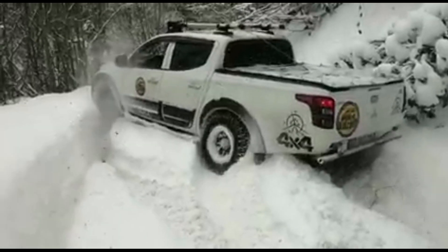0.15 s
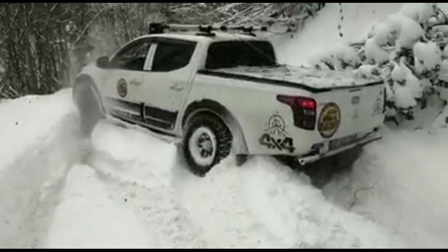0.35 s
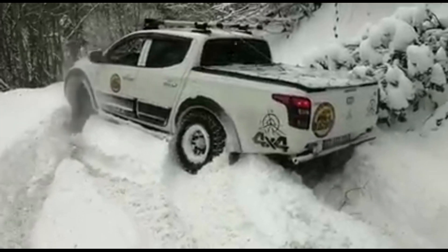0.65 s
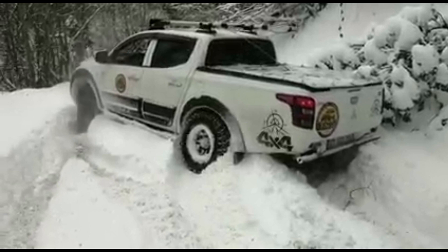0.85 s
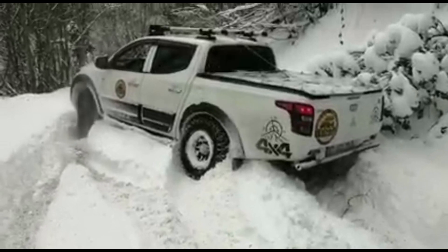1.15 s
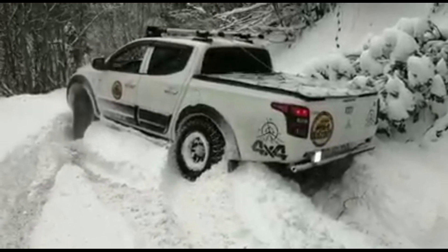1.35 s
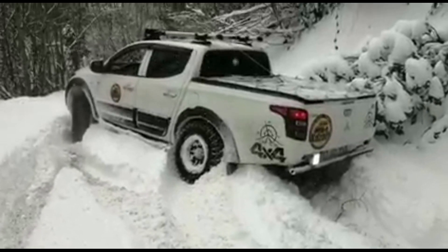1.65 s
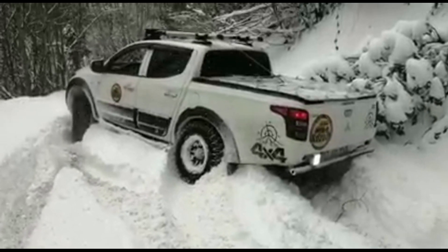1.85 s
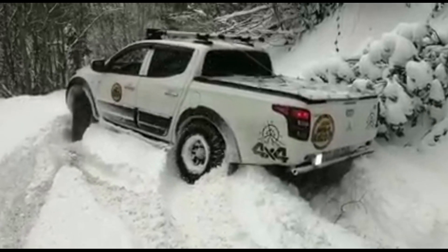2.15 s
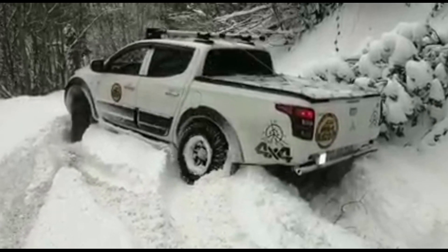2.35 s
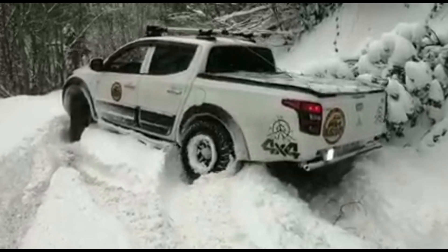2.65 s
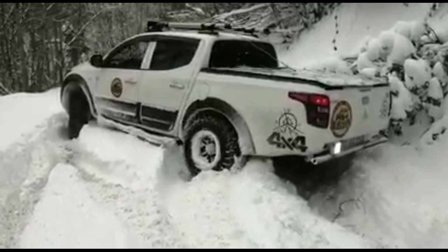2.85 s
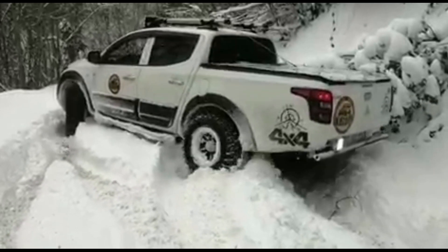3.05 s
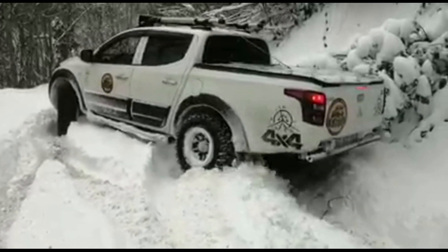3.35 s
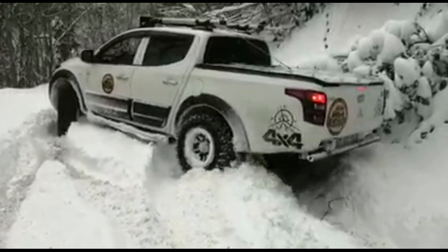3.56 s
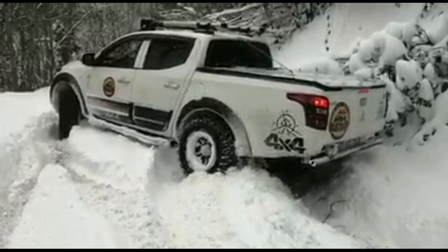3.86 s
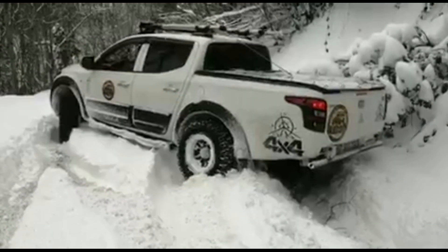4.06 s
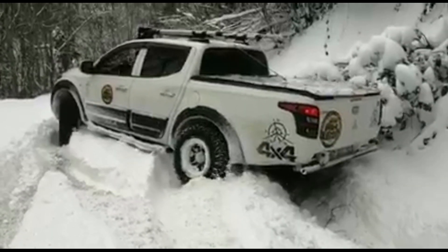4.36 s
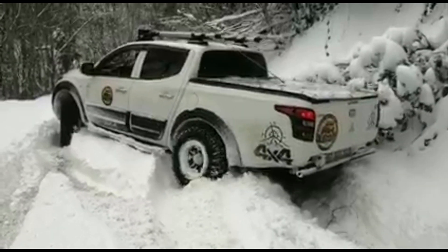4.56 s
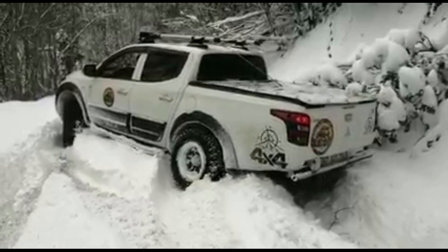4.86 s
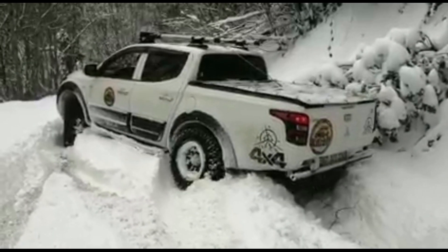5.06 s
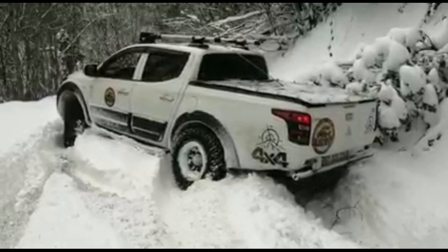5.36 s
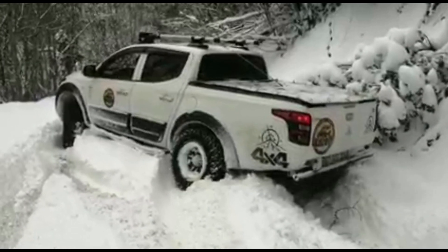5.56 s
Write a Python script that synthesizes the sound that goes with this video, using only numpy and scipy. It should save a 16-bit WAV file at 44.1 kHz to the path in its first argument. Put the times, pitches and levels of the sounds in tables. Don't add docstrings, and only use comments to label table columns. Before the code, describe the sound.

Rough engine roar and tearing tyre noise fill the first three seconds, pulsing with the firings under a bright powder hiss. A second exhaust booms in short revs. The roar collapses into single metallic knocks and soft falling snow, then the engine catches with low throbbing and uneven knocking. Close outdoor stereo pickup, slightly coloured by camera movement and short echoes, over faint distant engine wash.

```python
import sys
import numpy as np
from scipy import signal
from scipy.io import wavfile
from scipy.ndimage import uniform_filter1d

SR = 44100
rng = np.random.default_rng(int(sys.argv[2]) if len(sys.argv) > 2 else 0)


def store_pcm(level_fs):
    pcm = np.round(np.clip(level_fs, -1, 1) * 32767).astype(np.int16)
    wavfile.write(sys.argv[1], SR, np.atleast_2d(pcm).T)


def boost(x):
    u = np.asarray(x, float) / 20
    return 10 ** u


N = 251760
T = np.arange(N) / SR

# (time [s], rate [Hz])
FIRING_HZ = [(0, 110), (.8, 105), (1.5, 77), (2.2, 70), (2.6, 65), (3.0, 56), (3.5, 48), (3.7, 39.4),
             (3.9, 37.9), (4.1, 33.8), (4.27, 31.05), (4.37, 26), (4.53, 39.1), (4.7, 54), (5.0, 56),
             (5.4, 51), (5.71, 45)]
# (time [s], level [dB])
LOAD_DB = [(0, -35), (.17, -41), (.35, -34.5), (1.4, -33.5), (1.76, -39.5), (1.86, -33.5), (2.89, -34),
           (3.47, -43.5), (3.55, -48.5), (4.18, -60), (4.36, -58), (4.4, -48), (4.75, -38), (4.85, -45),
           (4.94, -42.5), (5.3, -45), (5.45, -49.5), (5.71, -48.5)]
# (time [s], level [dB])
SPIN_DB = [(0, -34.5), (.06, -30), (.17, -32.5), (.5, -29.5), (1.0, -27), (1.38, -29), (1.57, -38.5),
           (1.79, -39.5), (1.84, -33), (2.5, -31.5), (3.5, -55), (4.33, -67), (4.43, -58.5), (4.72, -52.5),
           (4.77, -44), (4.83, -53), (5.06, -46.5), (5.71, -56)]
# (time [s], turn to the left [0-1], edge of the left port's shadow [Hz])
CAMERA_SWING = [(0, 0.55, 2850), (.5, 0.05, 3310), (1.45, 0.1, 3360), (1.72, 0.36, 3270),
                (2.15, 0.15, 3330), (2.6, 0.36, 3130), (2.75, 0.43, 2600), (3.1, 1, 1780), (3.6, 0.5, 1700),
                (4.3, 0.74, 1700), (4.6, 0.3, 2140), (5.05, 0.09, 3630), (5.71, 0.66, 2970)]
# (time [s], dip frequency [factor], lowest dip frequency [factor], lowest dip depth [share])
ECHO_DRIFT = [(0, 1.08, 1.08, 0.16), (.18, 0.97, 0.94, 0.54), (.24, 0.98, 0.92, 0.4),
              (.42, 1.07, 0.94, 0.87), (.48, 1, 0.97, 0.5), (1.4, 1.04, 0.99, 0.97), (1.9, 1, 0.973, 1),
              (2.9, 0.952, 0.937, 0.64), (3.4, 0.92, 0.95, 1), (4.4, 0.89, 0.89, 0.83),
              (5.71, 0.85, 0.89, 0.97)]


def evened(x):
    return x / np.sqrt(np.mean(x ** 2) + 1e-20)


def read(points, hz):
    f, value = np.transpose(points)
    return np.interp(np.log(hz + 1), np.log(f + 1), value)


def follow(rows, t=T):
    s, *columns = np.transpose(rows)
    return [np.interp(t, s, c) for c in columns]


def wobble(smooth_s):
    size = int(smooth_s * SR) + 1
    return evened(uniform_filter1d(uniform_filter1d(rng.standard_normal(N), size), size))


def bumps(rows):
    return sum(db * np.exp(-((T - s) / length_s) ** 2) for s, db, length_s in rows)


def firing_turns():
    anchor_s, anchor_turns = 3.7, .29
    turns = np.cumsum(follow(FIRING_HZ)[0]) / SR
    return turns - turns[round(anchor_s * SR)] + anchor_turns


def knock_db():
    base_db, db_per_hz, from_hz, most_db = 3, .3, 62, 13
    slow_hz = np.maximum(from_hz - follow(FIRING_HZ)[0], 0)
    return np.minimum(base_db + db_per_hz * slow_hz, most_db)


def knocks(share, decay_s=.014):
    turns = firing_turns()
    since_s = (turns % 1) / follow(FIRING_HZ)[0]
    strength = rng.uniform(.7, 1.1, 1000)[np.floor(turns).astype(int) % 1000]
    shape = uniform_filter1d(strength * np.exp(-since_s / decay_s), size=160)
    gain = boost(share * knock_db() * shape)
    return gain / np.sqrt(uniform_filter1d(gain ** 2, size=4000))


def ported(tone, envelope, patchy_db, tilt=None, alike=0.97):
    # (frequency [Hz], correlation [0-1])
    likeness = [(100, 0.93), (400, 0.97), (750, 1), (1050, 0.79), (1550, 1), (2000, 0.94), (2400, 0.99),
                (3000, 0.63), (3300, 0.48), (3600, 0.8), (5200, 0.63), (6500, 0.4), (12000, 0.4)]
    # (frequency [Hz], phase [rad])
    phase_lead = [(170, .1), (430, .2), (780, 0), (1080, .75), (1600, .05), (1780, -.3), (1963, -3.1),
                  (2130, -5.1), (2400, -6.3), (2600, -6.8), (2800, -7.9), (3200, -9.2), (4200, -9.8),
                  (5200, -9.4), (6000, -8.7), (7300, -4.8)]
    noise = envelope * rng.standard_normal((2, N))
    hz, t, (a, b) = signal.stft(noise, SR, nperseg=1024, noverlap=768)
    patches = uniform_filter1d(rng.standard_normal((2,) + a.shape), size=3, axis=1)
    patches = evened(uniform_filter1d(patches, size=36, axis=2))
    patches = .8 * patches[0] + .6 * patches * [[[0]], [[1]]] + .2 * patches
    same = np.clip(alike * read(likeness, hz), 0, 1)[:, None]
    hz = hz[:, None]
    moved_hz = hz / follow(ECHO_DRIFT, t)[1] ** np.clip((2900 - hz) / 600, 0, 1)
    right = (same * a + np.sqrt(1 - same ** 2) * b) * np.exp(1j * read(phase_lead, moved_hz))
    tilt_db = tilt(hz, t) if tilt else 0
    z = np.array([a * boost(tilt_db / 2), right / boost(tilt_db / 2)]) / np.cosh(tilt_db / 17)
    inside = (hz >= tone[0][0]) & (hz <= tone[-1][0])
    z *= inside * boost(read(tone, hz) + patchy_db * np.clip(hz / 2500, .3, 1) * patches)
    out = signal.istft(z, SR, nperseg=1024, noverlap=768)[1][:, :N]
    return out / np.std(out.mean(0))


def placed(x, level_db, pan_db):
    return x * boost(level_db + np.array([pan_db, -pan_db]) / 2) / np.cosh(pan_db / 17)


def block():
    # (frequency [Hz], density [dB/Hz])
    block_tone = [(260, -71), (450, -6.5), (477, -27), (532, -5), (768, -11), (920, 1.5), (994, -2),
                  (1500, 0), (1920, -6.5), (2100, -10), (2730, -18.5), (4620, -120)]
    pan_db, turn_db = 2.5, -3
    clatter = knocks(0.65) * boost(0.99 * wobble(0.018) + 0.37 * wobble(0.00051))
    x = ported(block_tone, clatter, patchy_db=-1.0)
    return placed(x, follow(LOAD_DB)[0], pan_db + turn_db * follow(CAMERA_SWING)[0])


def tyres():
    # (frequency [Hz], density [dB/Hz])
    tyre_tone = [(1060, -16), (1800, -3.5), (1930, -1.5), (2100, -2), (2220, -2), (2590, -6), (2840, -4),
                 (3260, -8), (4040, -17.5), (4400, -27.5), (5720, -61), (9680, -120)]
    top_full_db, top_db_per_khz, top_full_hz = 6, -12.5, 2466

    def shade(hz, frames_s):
        return -10 / (1 + np.exp((follow(CAMERA_SWING, frames_s)[1] - hz) / 120))

    lumps = knocks(0.58) * boost(0.33 * wobble(0.024) + 0.53 * wobble(0.00061))
    churn = ported(tyre_tone, lumps, patchy_db=2.0, tilt=shade)
    top = signal.sosfiltfilt(signal.butter(4, 3000, "high", fs=SR, output="sos"), churn)
    over_khz = np.maximum(follow(CAMERA_SWING)[1] - top_full_hz, 0) / 1e3
    top_db = top_full_db + top_db_per_khz * over_khz
    return boost(follow(SPIN_DB)[0]) * (churn + (boost(top_db) - 1) * top)


def rings():
    # (frequency [Hz], level [dB], t60 [s])
    iron_modes = [(900, -3, .045), (1060, 0, .05), (1230, 0, .05), (1450, -3, .04), (1750, -11, .03),
                  (2150, -9, .03), (2600, -12, .025), (2900, -14, .02)]
    # (time [s], peak [dB], crack re knock [dB])
    single_knocks = [(3.696, -40, -17), (3.72, -44, -16), (3.745, -43, -13), (3.768, -35, -19),
                     (3.793, -45, -19), (3.818, -45, -16), (3.85, -48, -15.5), (3.873, -43, -14),
                     (3.898, -37.5, -14), (3.929, -40, -16), (3.953, -39, -19), (3.981, -41, -18),
                     (4.011, -46, -13.5), (4.033, -51, -16), (4.066, -54, -19), (4.098, -38.5, -23),
                     (4.123, -44, -19), (4.184, -38, -20), (4.216, -43, -20), (4.249, -38, -25),
                     (4.279, -37.5, -25), (4.312, -38, -22), (4.353, -37, -19), (4.386, -36, -22),
                     (4.393, -29.5, -23), (4.422, -27.5, -19), (4.454, -32.5, -6), (4.482, -28, -19),
                     (4.511, -34, -18), (4.529, -33, -13), (4.568, -38, -16), (4.595, -39, -17)]
    # (time [s], peak [dB])
    pull_knocks = [(4.596, -39), (4.613, -40), (4.645, -35), (4.736, -29), (4.754, -25), (4.803, -29),
                   (4.825, -35), (4.939, -32), (4.98, -33), (5.006, -29), (5.025, -27), (5.077, -36),
                   (5.128, -33), (5.17, -28), (5.224, -40), (5.248, -31), (5.282, -32), (5.325, -34),
                   (5.383, -40), (5.442, -41)]
    ring_db, load_share, knock_share, knock_most_db = -42, 0.75, 2.02, 13
    knock_ring_db, pull_ring_db = -6, -9.5
    crack_level_db, crack_decay_s = -1 - 9.5, 0.0046

    s, knock_peak_db, crack_db = np.transpose(single_knocks)
    pull_s, pull_db = np.transpose(pull_knocks)
    fired = np.flatnonzero(np.diff(np.floor(firing_turns())))
    fired = fired[(fired < (s[0] - .012) * SR) | (fired > (s[-1] + .012) * SR)]
    peak_db = ring_db + load_share * (follow(LOAD_DB)[0] + 60)
    peak_db = peak_db + knock_share * (knock_db() - knock_most_db)
    at = np.concatenate([np.round(s * SR), fired, np.round(pull_s * SR)]).astype(int)
    size = boost(np.concatenate([knock_peak_db + knock_ring_db, peak_db[fired], pull_db + pull_ring_db]))

    chance = rng.random((450, 2 * len(iron_modes)))[:len(at)]
    t, out = np.arange(2000) / SR, np.zeros(N)
    for k, (hz, db, t60_s) in enumerate(iron_modes):
        blows = np.zeros(N, complex)
        blows[at] = size * (.75 + .4 * chance[:, 2 * k]) * np.exp(2j * np.pi * chance[:, 2 * k + 1])
        ring = (1 - np.exp(-t / .0008)) * boost(db - 60 * t / t60_s) * np.exp(2j * np.pi * hz * t)
        out += signal.oaconvolve(blows, ring)[:N].real

    cracks = np.zeros(N)
    cracks[at[:len(s)]] = boost(knock_peak_db + crack_db + crack_level_db)
    band = signal.butter(2, [2000, 6000], "band", fs=SR, output="sos")
    bright = evened(signal.sosfilt(band, rng.standard_normal((2, N))))
    cracks = signal.oaconvolve(cracks, np.exp(-t / crack_decay_s))[:N]
    return out * np.array([[1.], [-1.]]).clip(-1, 1) * boost([[1.], [-1.]]) * [[1.], [-1.]] + bright * cracks


def plumes_db():
    # (start [s], end [s], level [dB])
    plumes = [
        (0, 0.344, -52),
        (0.45, 1.393, -48.5),
        (1.46, 2.904, -55.5),
        (2.95, 3.513, -66),
        (3.726, 4.004, -68),
        (4.403, 5.71, -74),
    ]
    rise_s, fall_db_per_s, spin_share, drift_db = 0.085, 94, 0.43, -72.5
    spin_db = follow(SPIN_DB)[0]
    power = boost(2 * drift_db)
    for start, end, db in plumes:
        rise = np.clip((T - start) / rise_s + 1, 0, 1)
        power = power + rise * boost(2 * (db - fall_db_per_s * np.maximum(T - end, 0)))
    return 10 * np.log10(power) + spin_share * (spin_db - uniform_filter1d(spin_db, size=SR))


def spray():
    # (frequency [Hz], density [dB/Hz])
    spray_tone = [(2530, -17.5), (4300, 0), (4490, 2.5), (5800, 3.5), (6670, -5.5), (7620, -2), (8390, -6),
                  (9000, -3.5), (10000, -12), (12100, -27.5), (14400, -18.5), (15400, -42)]
    # (time [s], level [dB], length [s])
    puff_rows = [
        (4.194, -67.5, 0.014),
        (4.253, -71, 0.013),
        (4.396, -64, 0.0055),
        (4.43, -67, .006),
        (4.454, -69, .005),
        (4.756, -68, 0.022),
    ]

    def tilt(hz, frames_s):
        turn = follow(CAMERA_SWING, frames_s)[0]
        low_db, high_db = -3 - 16 * turn, -12.5 - 11 * turn
        share = np.clip((hz - 5600) / 900, 0, 1)
        return ((1 - share) * low_db + share * high_db) * np.clip((12000 - hz) / 2000, .15, 1)

    hiss = boost(plumes_db()) * knocks(0.46) * boost(1.3 * wobble(0.042) + 0.57 * wobble(0.00052))
    puffs = sum(boost(db) * np.exp(-((T - s) / length_s) ** 2) for s, db, length_s in puff_rows)
    envelope = np.hypot(hiss, puffs)
    return np.sqrt(np.mean(envelope ** 2)) * ported(spray_tone, envelope, patchy_db=2.2, tilt=tilt)


def rumble():
    # (frequency [Hz], density [dB/Hz])
    rumble_tone = [(90, -30), (120, -6), (200, -1.5), (270, -5), (330, -4.5), (450, -3), (540, -1.5),
                   (700, -5), (800, -10), (950, -54)]
    # (frequency [Hz], density [dB/Hz])
    deep_tone = [(15, -30), (30, -4), (55, -16.5), (110, -3), (150, -20)]
    # (frequency [Hz], left minus right [dB])
    low_tilt = [(60, 5.0), (120, -5.0), (240, -1.0), (480, -10.0), (950, 20.0), (1890, 19.0), (3770, -4.5),
                (7520, -9.5), (15000, -3.5)][:6]
    # (time [s], level [dB], length [s])
    surges = [
        (0, 21, 0.011),
        (.075, 13, 0.04),
        (3.48, 3.5, 0.21),
        (4.01, -2.5, 0.15),
        (4.28, -1.5, .05),
        (4.4, 2.5, 0.037),
    ]
    # (time [s], level [dB], length [s])
    lulls = [
        (.25, -3, 0.16),
        (4.25, -8, 0.08),
    ]
    arrive_db, arrive_s = -14.5, 0.32
    deep_far_db, deep_near_db, deep_near_s = -4.5, 1, 2
    swell_db = -47.5 + arrive_db * np.exp(-T / arrive_s)
    deep_db = deep_far_db + (deep_near_db - deep_far_db) / (1 + np.exp((deep_near_s - T) / 0.3))
    shake = knocks(0.36) * boost(0.4 * wobble(0.013))
    body = ported(rumble_tone, shake, patchy_db=1.0, tilt=lambda hz, t: read(low_tilt, hz))
    deep = ported(deep_tone, np.ones(N), patchy_db=3.0)
    return boost(swell_db + bumps(surges) - 3.0) * body + boost(swell_db + deep_db + bumps(lulls) - 5.5) * deep


def exhausts():
    # (time [s], pitch [Hz], first order [dB], upper orders [dB])
    rev_a = [(1.15, 30.6, -78, -71), (1.25, 35.13, -69, -53.5), (1.406, 42.87, -48.5, -67),
             (1.594, 37.4, -58, -51), (1.782, 42.6, -47, -56), (1.85, 43.1, -58, -57),
             (2.264, 34.73, -87, -50.5), (2.334, 33.6, -70, -92), (2.452, 35.7, -57, -53)]
    rev_b = [(2.8, 32.4, -64, -77), (2.936, 35.3, -55, -47), (3.078, 41.2, -48, -51.5),
             (3.204, 38.24, -51, -52), (3.441, 57.15, -39, -44.5), (3.5, 53.44, -47, -68),
             (3.62, 43.57, -47, -48.5), (3.904, 49.1, -44, -49.5), (4.101, 32.3, -58, -70)]
    rev_c = [(4.42, 24.98, -70, -70), (4.47, 26.5, -60, -46), (4.56, 29, -67, -45.5),
             (4.67, 24.98, -67, -50), (4.86, 32.03, -56, -41.5), (5.078, 39.67, -59, -42),
             (5.36, 38.58, -63, -45), (5.584, 43.9, -52, -48), (5.709, 52.2, -44, -54)]
    # (order 2 [dB], order 3 [dB], order 4 [dB])
    upper_orders = [
        (0, -2.5, -7.5),
        (0, -14, -37),
        (0, -5.5, -12.5),
    ]
    # (frequency [Hz], level [dB])
    far_idle = [(54.3, -64), (215.5, -68), (270.5, -65)]
    # (time [s], firing rate [Hz], order 2 [dB])
    catch_rows = [(4.32, 29, -75), (4.36, 31, -51), (4.44, 36, -48), (4.5, 40, -51), (4.56, 45, -54),
                  (4.6, 47, -80)]
    note_level_db, note_db_per_hz, note_top_hz, catch_third_db = -58.5 + 4.5, 2, 75, -6

    note_db = note_level_db - note_db_per_hz * np.maximum(follow(FIRING_HZ)[0] - note_top_hz, 0)
    out = boost(note_db + 3.0 * wobble(0.06)) * np.sin(2 * np.pi * firing_turns())

    catch_hz, catch_db = follow(catch_rows)
    phase = 2 * np.pi * np.cumsum(catch_hz) / SR
    out += np.sqrt(2) * boost(catch_db) * (np.sin(2 * phase) + boost(catch_third_db) * np.sin(3 * phase))

    for rows, upper in zip((rev_a, rev_b, rev_c), upper_orders):
        hz, first_db, upper_db = follow(rows)
        orders_db = [first_db] + [upper_db + db for db in upper]
        start, end = rows[0][0], rows[-1][0]
        on = follow([(start, 0), (start + 0.022, 1), (end - .04, 1), (end + .02, 0)])[0]
        phase = 2 * np.pi * np.cumsum(hz) / SR
        for k, db in enumerate(orders_db):
            level = np.sqrt(2) * boost(db + 0.45 * wobble(0.084))
            out += on * level * np.sin((k + 1) * phase + 1.08 * k)

    for hz, db in far_idle:
        level = boost(db + 4.6 * wobble(0.1))
        out += level * np.sin(2 * np.pi * np.cumsum(hz * (1 + 0.00504 * wobble(0.32))) / SR)
    return out


def air():
    # (frequency [Hz], density [dB/Hz])
    air_tone = [(900, -2.5), (1300, -16.5), (1800, -0.5), (2370, -35), (3060, -11), (4190, -52),
                (4800, -21.5), (6130, -47), (6700, -28.5), (9080, -42), (11400, -44), (14500, -45),
                (15400, -55)]
    # (frequency [Hz], left minus right [dB])
    air_tilt = [(800, 22), (2000, -38), (3300, -7), (5500, 7), (7000, -25), (9000, -18), (11000, -8),
                (15000, -5)]
    wash = ported(air_tone, np.ones(N), patchy_db=3.5, tilt=lambda hz, t: read(air_tilt, hz), alike=0.21)
    return boost(-56.5) * wash


def clods():
    # (time [s], level [dB], pitch [Hz], length [s])
    clod_rows = [
        (.002, -31, 540, .005),
        (.0455, -34, 300, .0013),
        (.064, -36, 250, .0019),
        (.0945, -25.5, 460, .0018),
        (.1145, -29, 500, .0014),
                 (0.602, -48.5, 345, 0.061),
        (2.437, -31.5, 90, .0032),
        (2.74, -39, 183, .0064),
        (4.125, -42.5, 473, 0.007),
        (4.151, -51, 70, .09),
        (4.186, -45, 523, .031),
        (4.25, -51, 330, 0.046),
        (4.244, -51, 600, .023),
    ]
    b, a = signal.butter(2, [125, 750], "band", fs=SR)
    crumble = evened(signal.lfilter(b, a, rng.standard_normal(N)))
    out = np.zeros(N)
    for s, db, hz, length_s in clod_rows:
        shape = np.exp(-((T - s) / length_s * 2) ** 2)
        out -= boost(db) * shape * (np.cos(2 * np.pi * hz * (T - s)) + 0.36 * crumble)
    return out


def chips():
    # (time [s], peak [dB])
    chip_rows = [(.0943, -17), (.1145, -23), (.518, -21), (.753, -19), (1.004, -20), (1.822, -23),
                 (2.907, -24), (2.9744, -25), (3.0073, -25), (3.2528, -29), (4.386, -34)]
    chip_hz, chip_s = 2300, .00022
    out = np.zeros(N)
    for s, db in chip_rows:
        out -= boost(db) * np.exp(-((T - s) / chip_s) ** 2) * np.cos(2 * np.pi * chip_hz * (T - s))
    return out


def scene():
    low = exhausts()
    low = np.array([low, np.roll(low, 36)])
    grain_db = .9 * wobble(.002)
    roar = (block() + tyres()) * boost(grain_db)
    return roar + rings() + spray() + rumble() + air() + low + clods() + chips()


def echo_dips_db(hz, t):
    # (frequency [Hz], width [Hz], depth [dB])
    port_dips = [
        [(1840, 550, 3.5), (3000, 210, 2), (4320, 30, -11.5), (5700, 240, 0.5), (8600, 500, 28)],
        [(1926, 162, 14.5), (2600, 65, 13), (3267, 44, 12), (4590, 73, 2.5), (4976, 29, -6.5), (6000, 240, 1.5),
         (8140, 46, 0)],
    ]
    # (start [s], end [s], frequency [Hz], width [Hz], left gain [dB], right gain [dB])
    colour_rows = [(0, .2, 1360, 90, 2.5, -29), (0, .2, 2450, 197, -7, 4.5), (0, 0.28, 3100, 150, -5, -6),
                   (0.5, 0.427, 3170, 160, 4, 9), (.22, .45, 1960, 150, 4.5, -8),
                   (.22, 0.46, 1330, 100, 5.5, -11), (0.5, .43, 2530, 200, -2.5, -8),
                   (.3, 1.9, 3640, 250, 3, 0.5), (.3, 1.2, 6400, 300, 6, 1), (3, 1.75, 2870, 300, -1, 3),
                   (.2, 5.71, 14400, 700, -6, -1), (1, 3.4, 14100, 800, -8.5, -2),
                   (3, 4.2, 5000, 900, -4, -1.5), (4.4, 6.9, 6600, 300, 3, 0),
                   (4.8, 5.9, 2300, 200, 2.5, 1.5), (.7, 1.8, 3300, 60, -8, -5), (2, 2.6, 3780, 60, -3, -6),
                   (.6, 1.3, 1510, 86, 3, 3), (.3, 2.4, 2260, 33, 2, 2), (.3, 3.3, 2770, 55, 2.5, 3),
                   (0.46, 2.95, 930, 42, 2, 2), (1.7, 2.95, 1400, 70, 2, 1.5),
                   (4.03, 4.36, 3200, 290, -3, -2.5), (7, 5.71, 2100, 260, -2, -1),
                   (5.5, 5.33, 1070, 450, 2, 0.5), (0.8, 1.3, 2200, 330, -1, -1.5),
                   (4.82, 5.4, 4000, 300, 2, 3.5), (2.9, 3.45, 3000, 60, -5, -6),
                   (3, 3.45, 4150, 120, -6, -5)]
    drift, low, depth = follow(ECHO_DRIFT, t)
    dips_db = []
    for port in port_dips:
        port_sum_db = 0
        for f, width, db in port:
            move = low if f < 2200 else drift ** (f < 5000)
            port_sum_db = port_sum_db + db * depth ** (f < 2200) * np.exp(-((hz - f * move) / width) ** 2)
        dips_db.append(port_sum_db)
    dips_db = np.array(dips_db)
    for start, end, f, width, *port_db in colour_rows:
        on = np.clip(np.minimum(t - start, end - t) / 0.014 + 1, 0, 1)
        dips_db = dips_db - np.array(port_db)[:, None, None] * on * np.exp(-((hz - f) / width) ** 2)
    return dips_db


def band_power(z, smooth_frames):
    power = (abs(z) ** 2).reshape(z.shape[:-2] + (256, 4, -1)).mean(-2)
    return uniform_filter1d(power, size=smooth_frames, axis=-1)


def roll_off(x):
    return signal.sosfilt(signal.butter(12, 15280, fs=SR, output="sos"), x)


def record(dry):
    # (start [s], end [s], low edge [Hz], high edge [Hz])
    sum_gaps = [(.84, 1.08, 5170, 5450), (1.19, 1.22, 5170, 5400), (1.07, 1.17, 4320, 4740),
                (1.17, 1.24, 4400, 4560), (.88, .92, 3270, 3520), (1.03, 1.08, 3650, 3800),
                (1.31, 1.56, 4460, 4560), (1.44, 1.65, 3110, 3280), (1.86, 1.96, 3150, 3270),
                (1.95, 2.15, 3660, 3750), (2.12, 2.2, 4320, 5080), (2.2, 2.25, 4320, 4560),
                (2.21, 2.34, 5170, 5450), (4.5, 4.55, 3800, 3950), (4.67, 4.73, 4620, 5080),
                (4.89, 5.06, 2920, 3010), (4.93, 5.1, 4700, 4950), (5.1, 5.2, 4850, 4950),
                (5.07, 5.15, 3300, 3520), (5.15, 5.24, 3270, 3360), (5.25, 5.33, 3370, 3650),
                (5.18, 5.23, 5250, 5450), (.5, .75, 1900, 1990), (2.92, 3.0, 1840, 1940),
                (.87, 1.0, 12300, 13300), (1.1, 1.18, 11800, 13300), (1.2, 1.35, 12000, 13200),
                (1.77, 1.82, 12300, 13200), (1.9, 2.0, 12300, 13300), (2.15, 2.3, 12000, 13000)]
    hz, t, z = signal.stft(dry, SR, nperseg=2048, noverlap=1536)
    hz = hz[:, None]
    z = (z / boost(echo_dips_db(hz, t) + 0.75))[:, :1024]
    hz = hz[:1024]

    band_db = 10 * np.log10(band_power(z, 5) + 1e-16)
    around_db = uniform_filter1d(band_db, size=19, axis=1)
    threshold_db = around_db + .16 * np.maximum(around_db[::-1] - around_db, 0)
    margin_db = np.where(hz[::4] > 10200, 2.0, 2.6)
    empty = np.repeat(band_db < threshold_db - margin_db, 4, axis=1) & (hz > 2900)

    mid, side = (z[0] + z[1]) / 2, (z[0] - z[1]) / 2
    mid_db, side_db = (10 * np.log10(band_power(v, 7) + 1e-16) for v in (mid, side))
    lost = np.repeat(mid_db < side_db - 6, 4, axis=0) & (hz > 1600)
    mid = mid * np.where(lost, boost(-20), 1)
    for start, end, low_hz, high_hz in sum_gaps:
        inside = (hz > low_hz) & (hz < high_hz) & (t > start - .01) & (t < end + .01)
        mid = mid * np.where(inside, boost(-40), 1)

    z = np.array([mid + side, mid - side]) * np.where(empty, boost(-30), 1)
    z = np.pad(z, ((0, 0), (0, 1), (0, 0)))
    mix = signal.istft(z, SR, nperseg=2048, noverlap=1536)[1][:, :N]
    return roll_off(mix)


dry = scene()
out = record(dry)
store_pcm(out)
```